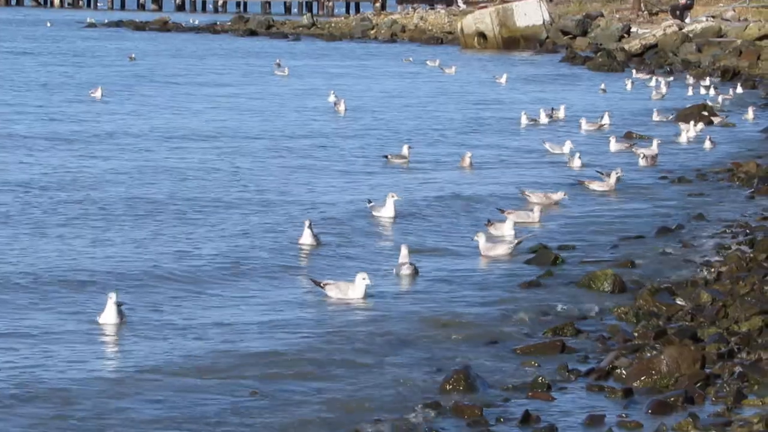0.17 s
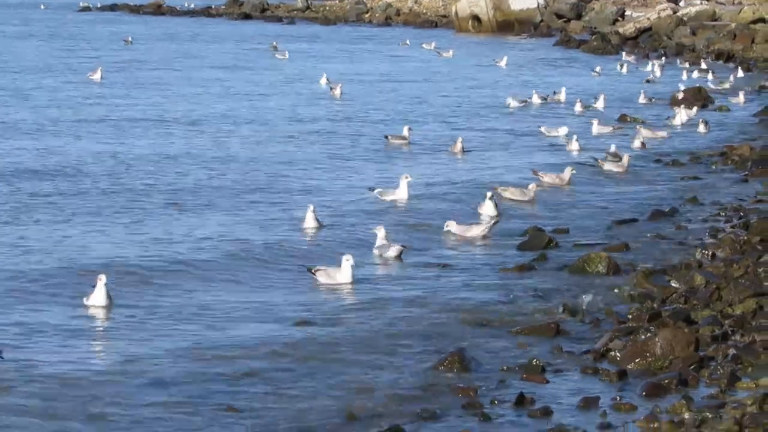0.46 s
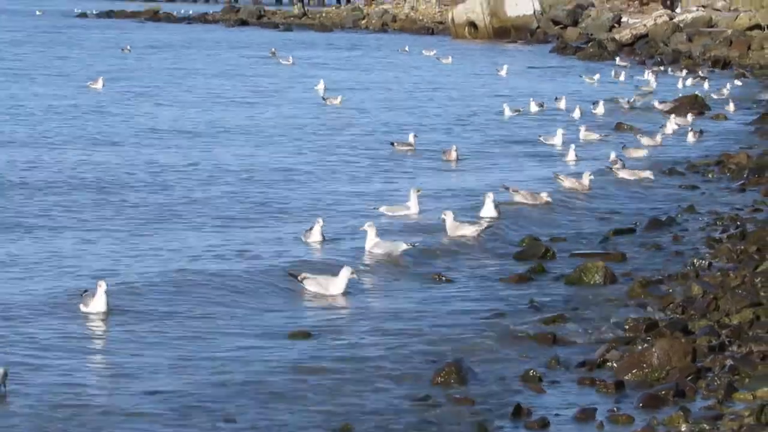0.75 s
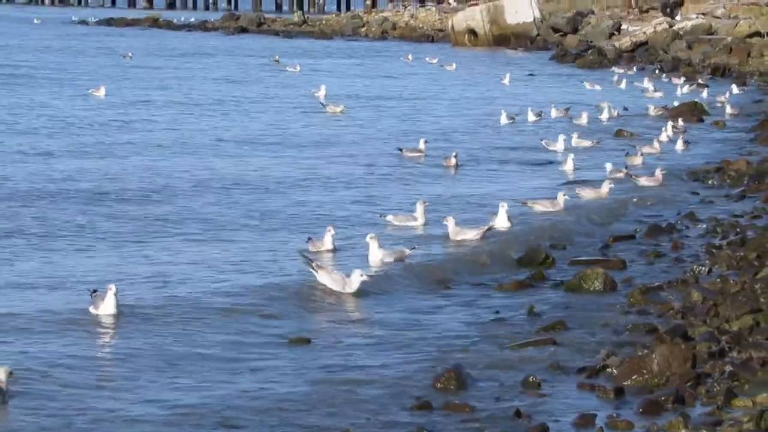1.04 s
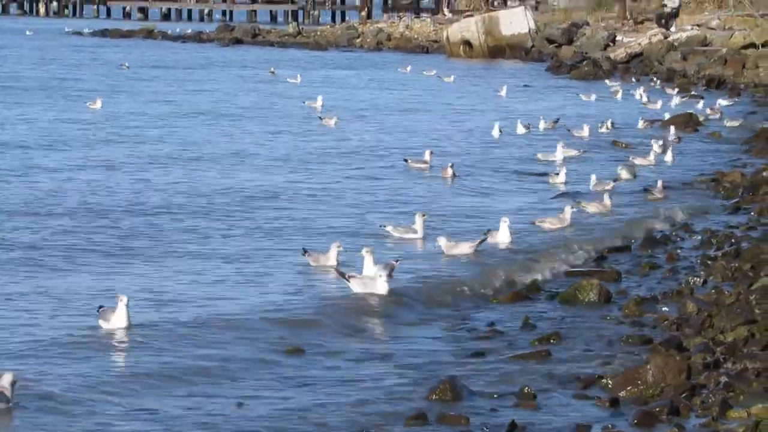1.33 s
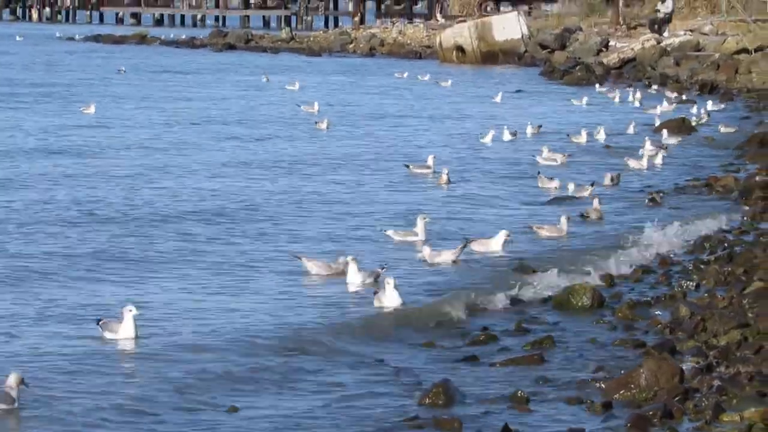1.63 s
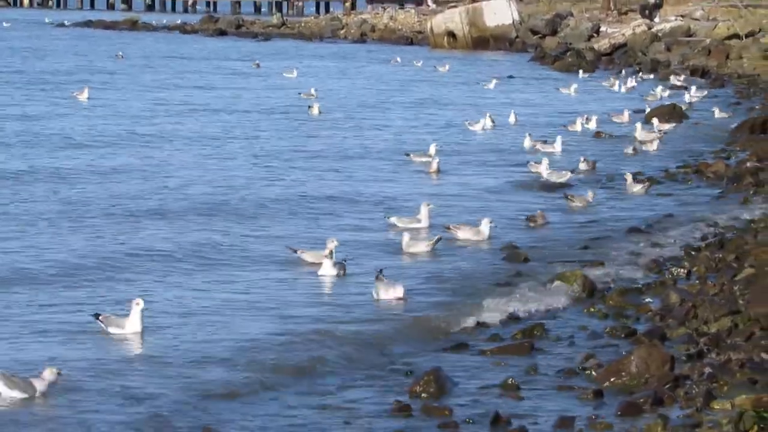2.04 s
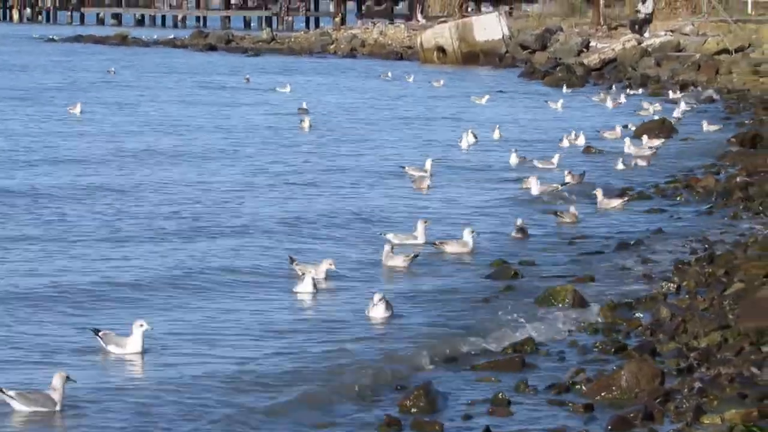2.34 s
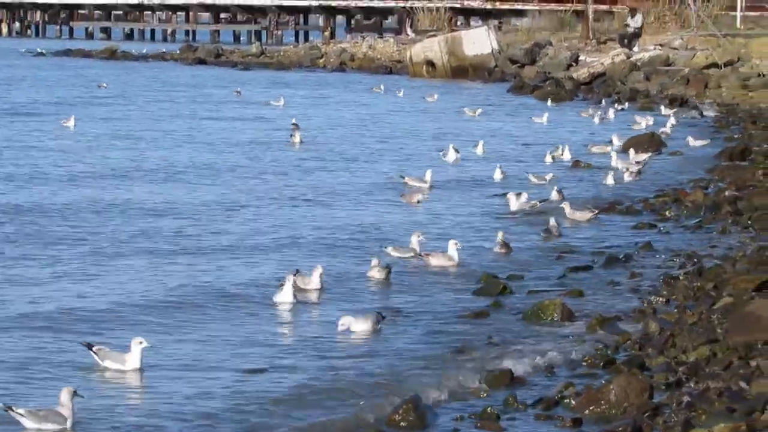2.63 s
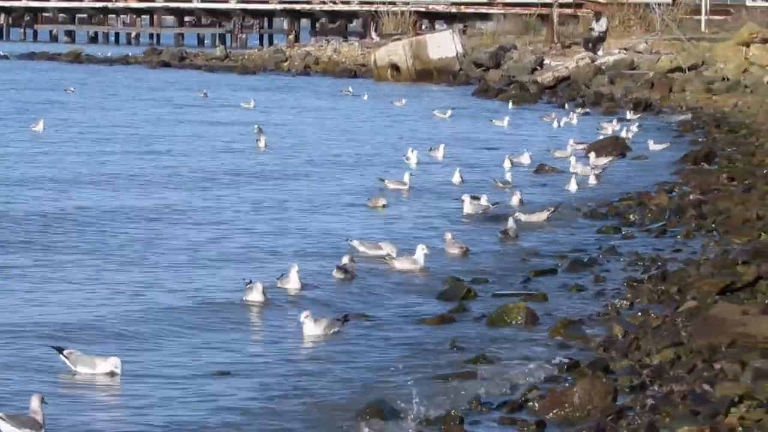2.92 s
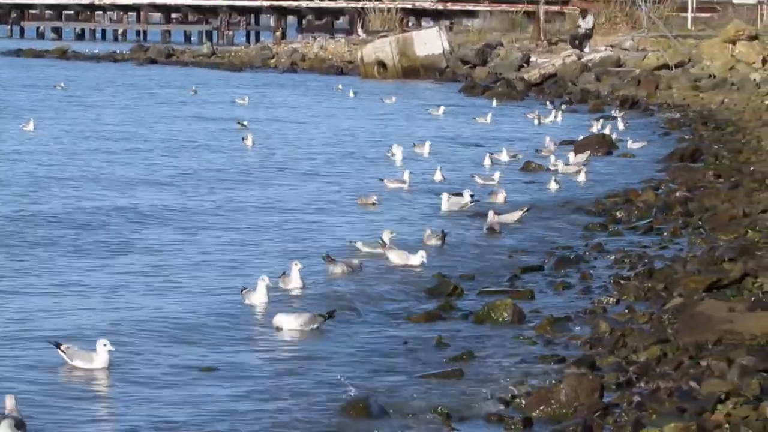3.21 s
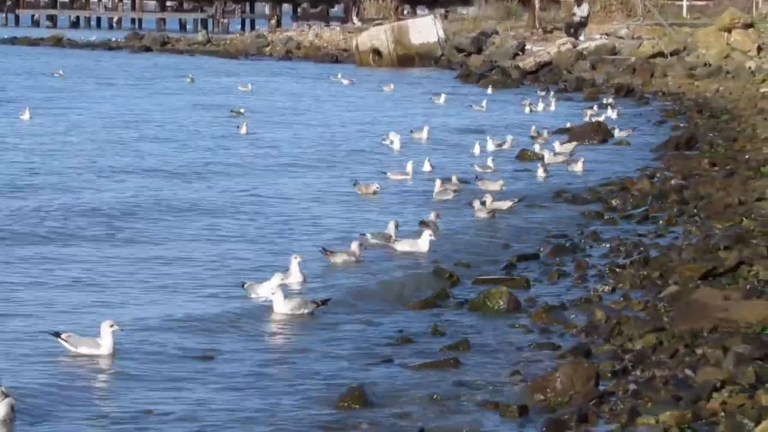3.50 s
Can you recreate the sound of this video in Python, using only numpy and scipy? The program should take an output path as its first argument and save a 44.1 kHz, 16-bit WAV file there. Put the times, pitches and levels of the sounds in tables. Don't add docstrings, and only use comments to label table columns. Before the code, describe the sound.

Gulls call with raspy croaks and sharp whistled cries over washing water and buffeting wind

```python
import sys
import numpy as np
from scipy import signal
from scipy.fft import rfft, irfft, next_fast_len
from scipy.io import wavfile
from scipy.ndimage import uniform_filter1d

SR = 44100
rng = np.random.default_rng(int(sys.argv[2]) if len(sys.argv) > 2 else 0)


def level_to_linear(level):
    exponent = np.asarray(level, float) / 20
    return 10 ** exponent


def file_out(sig):
    cols = np.atleast_2d(sig).T
    lim = np.clip(cols, -1, 1)
    pcm = np.round(lim * 32767).astype(np.int16)
    wavfile.write(sys.argv[1], SR, pcm)


N = 161406
START_S = 0.0945

# start_s, crest_s, end_s, crest_pitch_hz (second partial), level_db
WHISTLES = [
    (1.34, 1.42, 1.505, 3830, -50),
    (1.892, 1.915, 1.975, 3860, -42),
    (2.068, 2.137, 2.225, 4550, -45),
    (2.29, 2.356, 2.462, 4290, -48),
    (2.586, 2.585, 2.71, 4330, -32),
    (3.247, 3.3, 3.4, 4130, -27),
]
# arch_depth (ratio), low_partial_lift_db
WHISTLE_MANNERS = [(.8, -8), (2, -8), (1.4, 16), (1.1, 19), (1, 2), (.72, 3)]
WHISTLE_PARTIALS_DB = [-29.5, -3.5, -33, -14.5, -56, -26]
# start_s, length_s, start_pitch_hz, end_pitch_hz, level_db
RASPS = [(1.695, .055, 480, 495, -42), (3.152, .035, 420, 458, -31), (3.192, .068, 560, 584, -26),
         (3.34, .065, 700, 650, -35), (2.54, .03, 690, 705, -41), (2.455, .045, 540, 575, -46)]
# start_s, length_s, start_pitch_hz, end_pitch_hz, level_db
DEEP_RASPS = [(1.803, .05, 410, 505, -36), (2.05, .035, 440, 520, -45), (2.486, .052, 432, 503, -32),
              (2.98, .045, 440, 540, -44)]
# start_s, length_s, start_pitch_hz, end_pitch_hz, level_db
BREAKS = [(1.846, .04, 500, 520, -42), (3.176, .024, 520, 560, -30), (2.528, .02, 540, 560, -34)]
# start_s, length_s, start_pitch_hz, end_pitch_hz, level_db
DEEP_BREAKS = [(2.214, .025, 520, 500, -42), (2.262, .05, 500, 510, -40), (2.352, .045, 520, 500, -42),
               (3.415, .028, 560, 500, -39)]
# start_s, length_s, start_pitch_hz, end_pitch_hz, level_db
CROAKS = [
    (3.414, .03, 1300, 1150, -35),
]
# start_s, length_s, start_pitch_hz, end_pitch_hz, level_db
YELPS = [
    (2.541, .052, 1490, 1550, -38),
    (3.396, .026, 1330, 1285, -32),
]
YELP_PARTIALS_DB = [-13, -3, -17, -3, -18.5, -12.5]
# start_s, length_s, start_pitch_hz, end_pitch_hz, level_db
FAR_WHISTLES = [(.225, .055, 4350, 4600, -45), (.28, .05, 5150, 5200, -46), (.355, .055, 4500, 4420, -47),
                (1.1, .045, 3850, 4150, -53), (2.15, .085, 2600, 2060, -47), (1.145, .06, 4830, 4800, -54),
                (1.228, .025, 5300, 5550, -56), (2.093, .018, 3450, 3620, -40),
                (2.145, .027, 3480, 3430, -41), (2.203, .017, 3450, 3300, -43),
                (2.755, .045, 4600, 4800, -53), (2.965, .185, 4620, 4350, -53),
                (1.302, .08, 2720, 2420, -49), (3.03, .05, 3800, 3820, -46), (3.08, .022, 2330, 2400, -44),
                (3.44, .12, 4950, 4800, -54), (1.245, .05, 3000, 3200, -54), (2.07, .055, 2780, 3050, -51),
                (2.34, .035, 3250, 3030, -48), (2.4, .05, 5100, 4950, -59), (1.315, .06, 5350, 5000, -56),
                (1.98, .03, 4850, 4850, -57), (3.055, .015, 1950, 1850, -42)]
# freq_hz, level_db
THROAT = [(2200, -23.5), (2800, -0.5), (3350, -11.5), (4000, -3), (5100, -4), (6200, -15), (6900, -15),
          (9500, -31.5)]
# freq_hz, level_db
DEEP_THROAT = [(900, -25), (1900, 1), (2900, -6), (3400, -2.5), (4000, -5.5), (4950, -4.5), (5500, -5),
               (9000, -24)]

# time_s, level_db
WASH_SWELL = [(.1, -40), (.2, -41), (.3, -36.5), (.55, -36.5), (.75, -41.5), (1.02, -42.5), (1.1, -49.5),
              (1.7, -48.5), (2.9, -57), (3.1, -45), (3.35, -42.5), (3.66, -51)]
# freq_hz, density_db
WASH_COLOUR = [(150, -3), (250, -1.5), (3500, -9), (9130, -25.5), (12400, -21.5), (15000, -44)]
# freq_hz, density_db
SURF_COLOUR = [(40, 9.5), (180, -1), (600, -3.5), (3500, -14.5), (7500, -24.5), (14000, -30)]
# freq_hz, left_right_likeness (-1 to 1)
LIKENESS = [(250, 0.47), (640, 0.72), (3100, 0.58), (6800, -0.071), (12000, -0.21)]
# time_s, peak_db, brightness_db_per_octave
DROPS = [(0.312, -34, 8), (0.3738, -29, 3), (0.4396, -36, 1), (0.719, -38, 7), (2.7396, -22, -4),
         (2.7717, -25, -5), (2.885, -36, 0.5), (2.9283, -27, -5), (3.008, -24.5, 0), (3.065, -27, -4)]
# time_s, pitch_hz, level_db
PLOP = (.328, 290, -22)

# time_s, level_db, half_width_s
GUSTS = [(.217, -18.5, 0.027), (.295, -20.5, 0.016), (.48, -27, .04), (.561, -18, 0.045), (.68, -15, 0.034),
         (0.756, -11.5, 0.026), (0.866, -9, 0.028), (.976, -15, 0.042), (1.042, -7.5, 0.017),
         (1.165, -17, 0.12), (1.25, -24, 0.024), (1.305, -11, 0.0062), (1.363, -19.5, 0.018),
         (1.6, -28.5, 0.061), (1.697, -10, 0.011), (1.74, -6.5, 0.0089), (1.784, -16.5, 0.026),
         (1.9, -27, 0.097), (2.212, -19, 0.061), (2.291, -15, 0.014), (2.364, -11, 0.022),
         (2.43, -19, 0.026), (2.518, -13, 0.026), (2.608, -13, 0.022), (2.773, -23, 0.088),
         (2.845, -11, 0.0078), (3.1, -30.5, 0.13), (3.257, -20.5, 0.01),
         (3.36, -13.5, 0.033), (3.465, -17, 0.05), (3.2, -17, 0.0057), (3.6, -14, 0.074),
              (2.1, -43, 0.044)]
# freq_hz, level_db
MOTOR = [
    (51.2, -49.5),
    (102.3, -42),
    (153.6, -48),
]

# freq_hz, level_db
OVERALL_COLOUR = [(3700, -0.5), (3950, -10), (4100, -3), (7650, 0.5), (7900, -12), (8150, -0.5), (14250, 0.5),
                  (14650, -42), (15700, -58)]
# start_s, end_s, low_hz, high_hz
DROPOUTS = [(.392, .425, 8300, 9500), (.392, .425, 10300, 12300), (.46, .535, 8300, 10500),
            (.535, .58, 7900, 10200), (.58, .65, 8000, 9000), (.65, .7, 8500, 10500)]


def rms_one(x):
    return x / np.sqrt(np.mean(x ** 2) + 1e-20)


def at_hz(points, hz):
    table_hz, table_db = np.array(points).T
    return np.interp(np.log(hz), np.log(table_hz), table_db)


def band(x, lo_hz, hi_hz, order=2):
    return signal.sosfilt(signal.butter(order, [lo_hz, hi_hz], "band", fs=SR, output="sos"), x)


def drift(rate_hz, size=N):
    pole = np.exp(-80 * np.pi * rate_hz / SR)
    white = rng.standard_normal(size // 40 + 1002)
    slow = signal.lfilter([1], [1, -2 * pole, pole * pole], white)[1000:]
    return np.interp(np.arange(size) / 40, np.arange(len(slow)), rms_one(slow))


def gull_note(start_s, hz, db, partials_db, rough, grows_db=0.0, attack_s=0.0019):
    n = len(hz)
    t = np.arange(n) / SR
    wobble = (0.003 + 0.023 * rough) * drift(63, size=n)
    phase = 2 * np.pi * np.cumsum(hz * (1 + wobble)) / SR
    k = np.arange(1, len(partials_db) + 1)[:, None]

    swell_db = ((k == 1) - 0.3 * (k > 3)) * grows_db * t / t[-1]
    level_db = np.reshape(partials_db, (len(k), -1)) + swell_db + 0.56 * drift(55, size=n)
    frayed = np.array([np.sqrt(1 - rough ** 2) + rough * drift(190, size=n) for _ in k])
    sines = np.sin(k * phase + rng.uniform(0, 2.9, k.shape))
    tone = np.sqrt(2) * (level_to_linear(level_db) * frayed * sines).sum(axis=0)

    flutter = 1 + 0.39 * rough * drift(260, size=n)
    release_s = 0.009
    edges = np.clip(np.minimum(t / attack_s, (t[-1] - t) / release_s), 0, 1)
    tone = tone * flutter * level_to_linear(db) * edges
    pan_db = 1.5 + 1.5 * rng.normal()
    return int(start_s * SR), n, tone * level_to_linear(np.array([[pan_db], [-pan_db]]))


def near_whistles():
    notes = []
    for (start, crest, end, hz, db), (arch, low_db) in zip(WHISTLES, WHISTLE_MANNERS):
        t = np.arange(start, end, 1 / SR) - crest
        curve = np.where(t < 0, 12, 14)
        bend = 1 - curve * t ** 2 * arch
        loud_tilt = 0.17 * (db + 30.0) * np.maximum(np.arange(6) - 2, -1)
        lift = low_db * np.array([1, 0.066, 1.0, 0.094, 0, 0])
        partials = np.add(WHISTLE_PARTIALS_DB, loud_tilt) + lift
        fading_db = db - 100 * np.maximum(t, 0)
        notes.append(gull_note(start, hz * bend / 2, fading_db, partials, 0.012,
                               grows_db=29 - max(low_db, 0)))
    return notes


def gliding_calls(table, rough, attack_s, throat=None, partials_db=None):
    notes = []
    for start, length, first_hz, last_hz, db in table:
        hz = first_hz + (last_hz - first_hz) * np.linspace(0, 1, int(length * SR)) ** 0.95
        partials = partials_db
        if throat:
            lines = hz * np.arange(1, 19)[:, None]
            dulling = 0.91 * (db + 25.5) * np.maximum(np.log2(lines / 3200), 0)
            flicker = [1.67 * drift(45, size=len(hz)) for _ in lines]
            partials = at_hz(throat, lines) - 6 + dulling + flicker
        notes.append(gull_note(start, hz, db, partials, rough, attack_s=attack_s))
    return notes


def rock_echoes(calls):
    wet = 0
    for lag_s in rng.uniform(0.0026, 0.042, 10):
        gain = rng.normal(0, 1, (2, 1)) * np.exp(-lag_s / 0.013)
        wet = wet + np.roll(calls[::-1], int(lag_s * SR), axis=1) * gain
    return level_to_linear(-14) * wet


def gulls():
    notes = near_whistles()
    notes += gliding_calls(RASPS, 0.2, 0.015, throat=THROAT)
    notes += gliding_calls(DEEP_RASPS, 0.3, 0.02, throat=DEEP_THROAT)
    notes += gliding_calls(BREAKS, 0.9, 0.008, throat=THROAT)
    notes += gliding_calls(DEEP_BREAKS, 0.85, 0.01, throat=DEEP_THROAT)
    notes += gliding_calls(CROAKS, 0.6, 0.004, partials_db=YELP_PARTIALS_DB)
    notes += gliding_calls(YELPS, 0.04, 0.005, partials_db=YELP_PARTIALS_DB)
    notes += gliding_calls(FAR_WHISTLES, 0.07, 0.008, partials_db=[2.5, -20])
    calls = np.zeros((2, N + SR))
    for i, n, tone in notes:
        calls[0, i:i + n] += tone[0]
        calls[1, i + 1:i + n + 1] += tone[1]
    return (calls + rock_echoes(calls))[:, :N]


def hiss(colour, patchy_db):
    out, together = 0, drift(9)
    edges = 30 * 2 ** np.arange(0, 9.3, 0.5)
    white = rng.standard_normal((2, 2, N))
    for k, (lo, hi) in enumerate(zip(edges, edges[1:])):
        mid, side = band(white[k % 2], lo, hi)
        hz = np.sqrt(lo * hi)
        alike = np.clip(at_hz(LIKENESS, hz), -0.95, 0.95)
        stereo = np.sqrt(1 + alike) * mid + np.sqrt(1 - alike) * side * [[1], [-1]]
        flicker_db = patchy_db * (together + drift(37.0))
        out = out + level_to_linear(at_hz(colour, hz) + flicker_db) * stereo
    return rms_one(out)


def ring(clicks, hz, cycles):
    r, w = level_to_linear(-60 * hz / (cycles * SR)), 2 * np.pi * hz / SR
    return signal.lfilter([0, np.sin(w)], [1, -2 * r * np.cos(w), r * r], clicks + 1e-18)


def bubble_fizz():
    happens = rng.random((2, N)) < 500 / SR
    size = level_to_linear(6.6 * np.minimum(rng.exponential(1, N), 4))
    born = happens * size * rng.choice([-1, 1], N)
    born = born + 2.1 * born[::-1]
    dealt = rng.integers(0, 14, N)
    fizz = 0
    for k, hz in enumerate(np.geomspace(350, 9000, 14)):
        fizz = fizz + ring(born * (dealt == k), hz, 6.2) * (hz / 1000) ** -0.4
    return rms_one(fizz)


def stone_drops():
    time_s, peak_db, bright = np.transpose(DROPS)
    drops = np.zeros(N)
    for hz in np.geomspace(1300, 12000, 9):
        clicks = np.zeros(N)
        level_db = peak_db - 15 + rng.normal(0, 4, len(time_s)) + bright * np.log2(hz / 2000)
        clicks[(time_s * SR).astype(int)] = level_to_linear(level_db)
        drops += ring(clicks, hz, 23.0)
    plop_s, plop_hz, plop_db = PLOP
    lap = level_to_linear(plop_db) * (np.arange(N) == int(plop_s * SR))
    return drops + ring(lap, plop_hz, 18.0)


def water():
    time_s, level_db = np.transpose(WASH_SWELL)
    swell = level_to_linear(np.interp(np.arange(N) / SR, time_s, level_db) + 3)
    wash = swell * (hiss(WASH_COLOUR, patchy_db=1.6) + level_to_linear(-5) * bubble_fizz())
    surf = level_to_linear(-44) * hiss(SURF_COLOUR, patchy_db=1.83)
    left, right = wash + surf + stone_drops()
    return np.array([level_to_linear(2.0) * left, level_to_linear(-0.1) * np.roll(right, 1)])


def even_out(x):
    return x / np.sqrt(uniform_filter1d(x ** 2, size=1300, axis=1) + 0.13 * np.mean(x ** 2))


def wind():
    t = np.arange(N) / SR
    power = level_to_linear(2 * -43)
    for time_s, db, half_width_s in GUSTS:
        power = power + level_to_linear(2 * db) * np.exp(-((t - time_s) / half_width_s) ** 2)
    gust = np.sqrt(power)
    noise = rng.standard_normal((2, N))
    body = band(band(noise, 50.4, 108.5, order=1), 10.0, 169.0)
    edge = band(band(noise[::-1], 178, 286, order=1), 93, 242)
    edge_gust = level_to_linear(-14) * gust * (gust / level_to_linear(-11)) ** (2.9 - 1)
    side, mid = gust * even_out(body) + edge_gust * even_out(edge)
    return side * np.array([[1], [-1]]) + level_to_linear(-14.5) * mid - 0.059 * side


def motor():
    t = np.arange(N) / SR + 0.000069 * drift(9.9)
    hum = 0
    for hz, db in MOTOR:
        hum = hum + np.sqrt(2) * level_to_linear(db + 2.0 * drift(0.83)) * np.sin(2 * np.pi * hz * t + hz)
    return hum


def drop_bands(x):
    hz, t = np.arange(N // 2 + 1) * SR / N, np.arange(N) / SR
    mid = rfft(x.mean(axis=0))
    lost = 0
    for start, end, lo, hi in DROPOUTS:
        fade = np.clip(np.minimum(t - start, end - t) / 0.006 + 0.5, 0, 1)
        lost = lost + irfft(mid * (hz > lo) * (hz < hi), N) * fade
    return x - lost


def scene():
    return (gulls() + water() + wind() + motor()) * (np.arange(N) > START_S * SR)


def band_limit(x):
    return signal.sosfilt(signal.butter(12, 15710, fs=SR, output="sos"), x)


def record(dry):
    size = next_fast_len(N + SR // 10)
    hz = np.arange(size // 2 + 1) * SR / size + 1
    coloured = irfft(rfft(dry, size) * level_to_linear(at_hz(OVERALL_COLOUR, hz)), size)[:, :N]
    overloaded = np.tanh(coloured / 1.083)
    mix = drop_bands(overloaded) * 1.26 * (np.arange(N) > START_S * SR)
    return band_limit(mix)


dry = scene()
out = record(dry)
file_out(out)
```